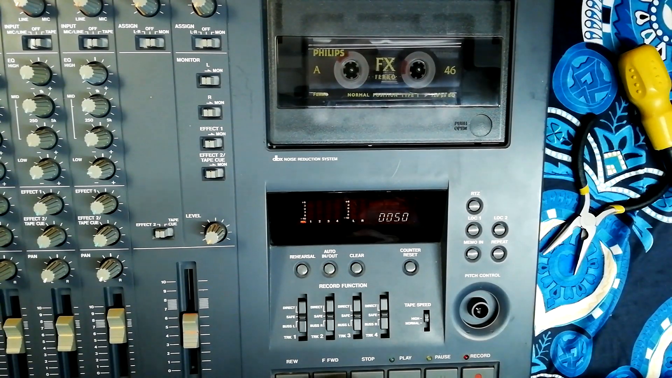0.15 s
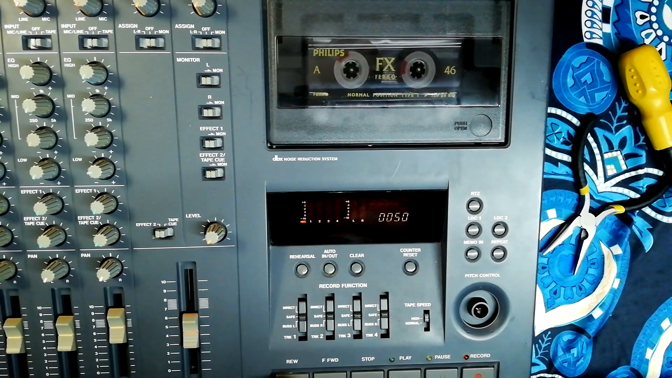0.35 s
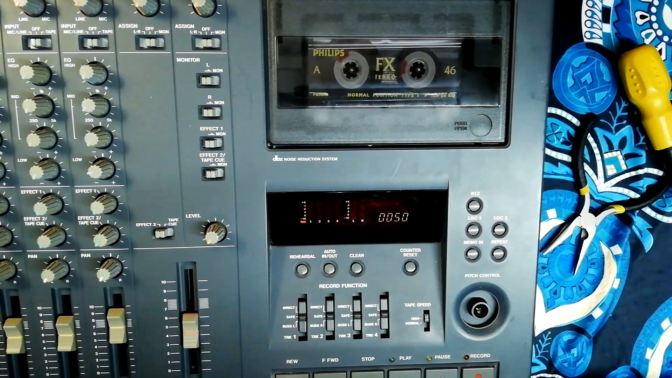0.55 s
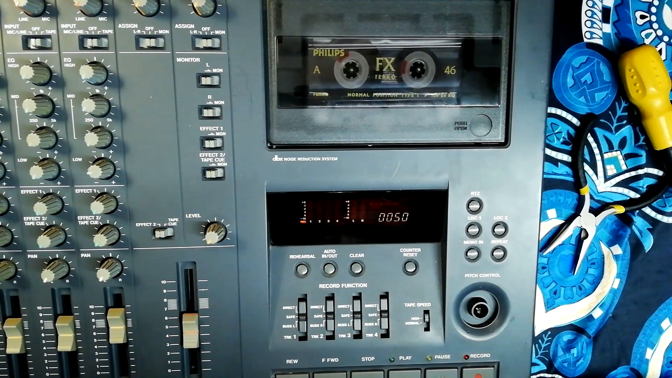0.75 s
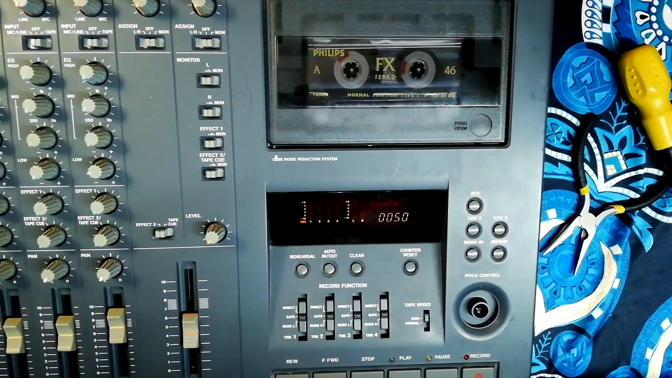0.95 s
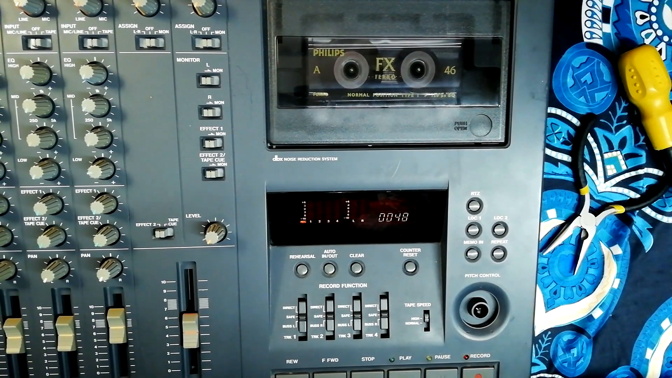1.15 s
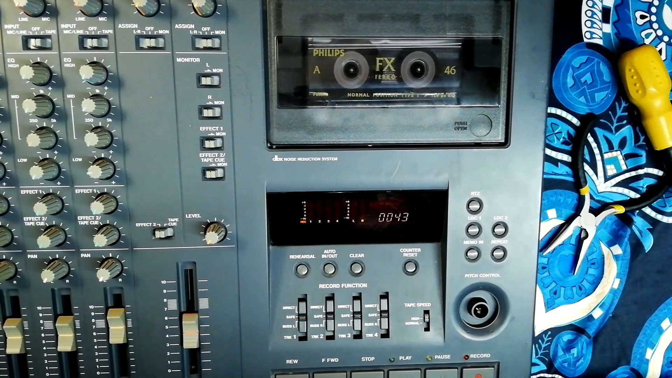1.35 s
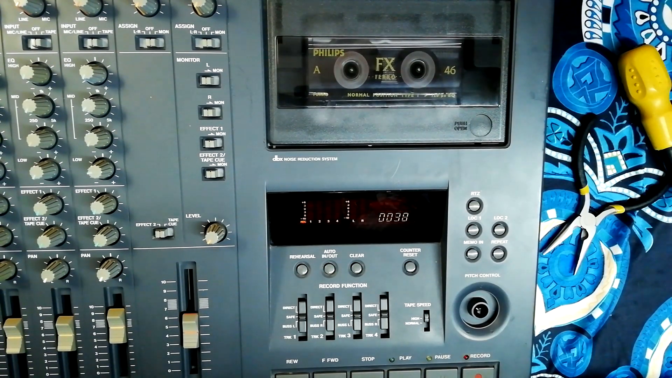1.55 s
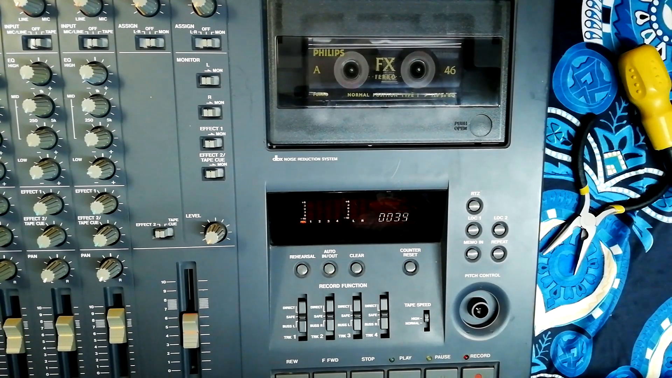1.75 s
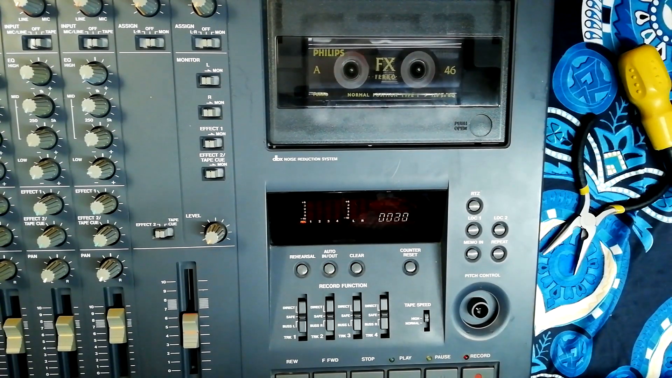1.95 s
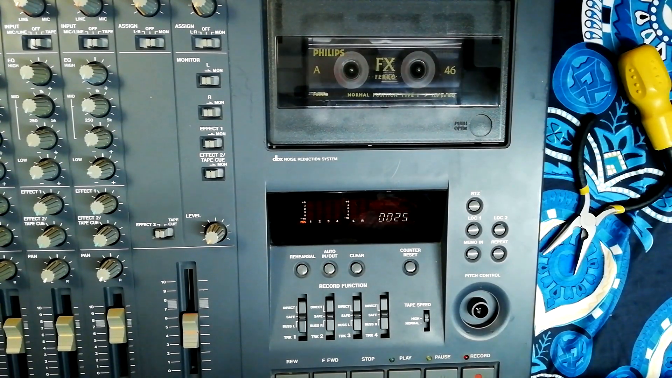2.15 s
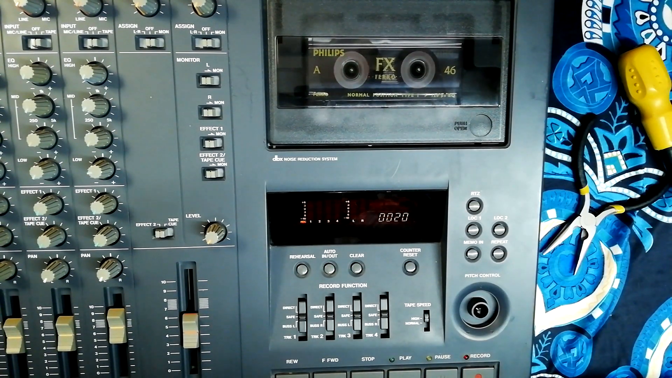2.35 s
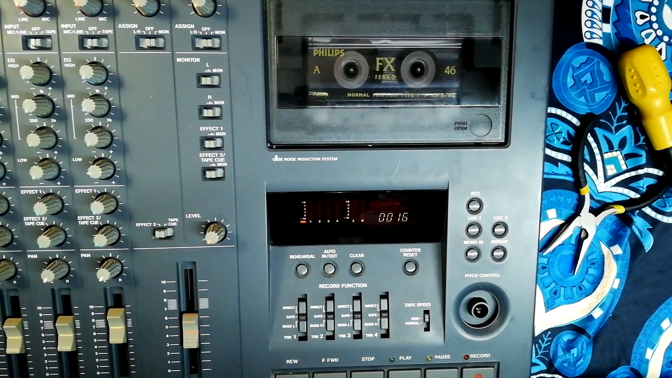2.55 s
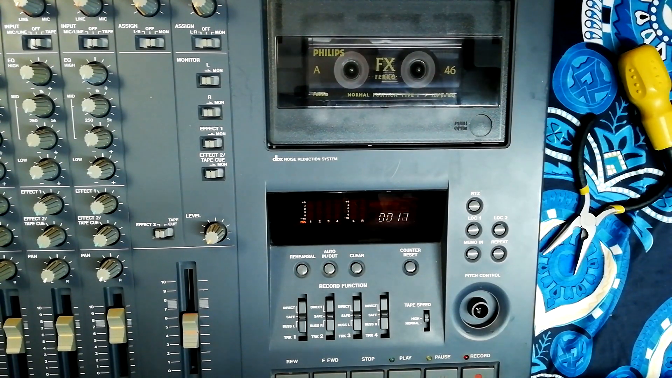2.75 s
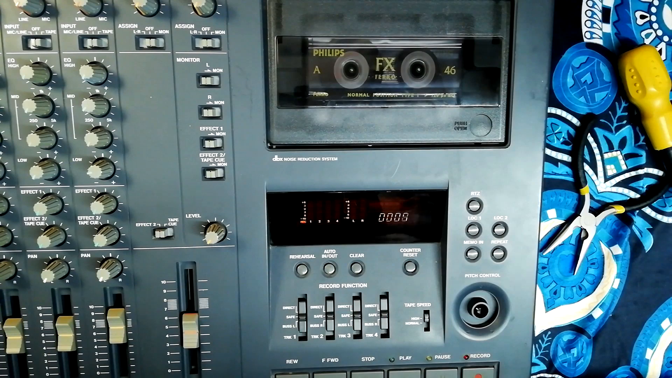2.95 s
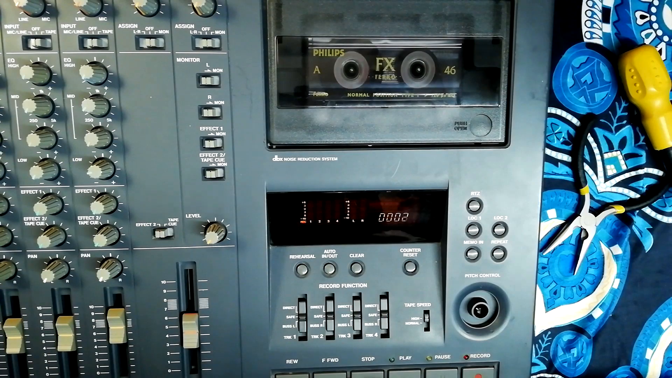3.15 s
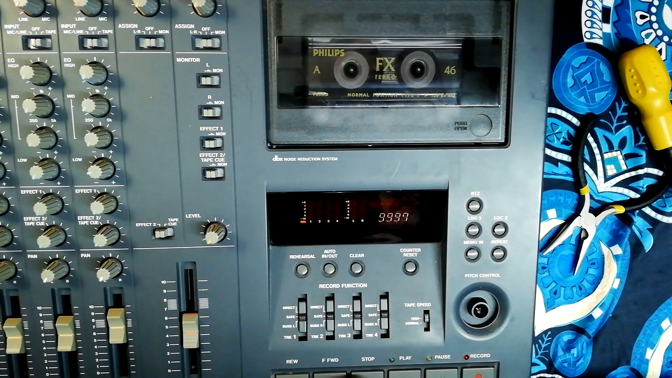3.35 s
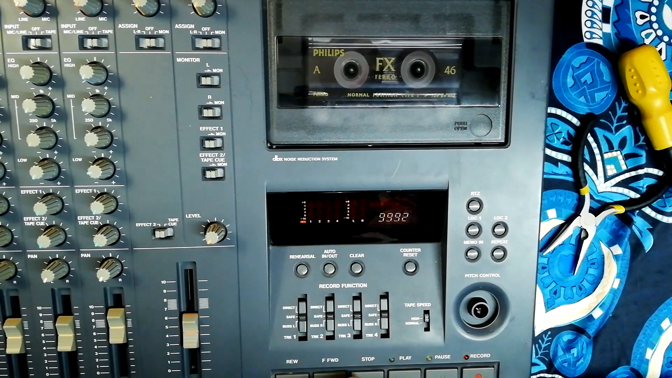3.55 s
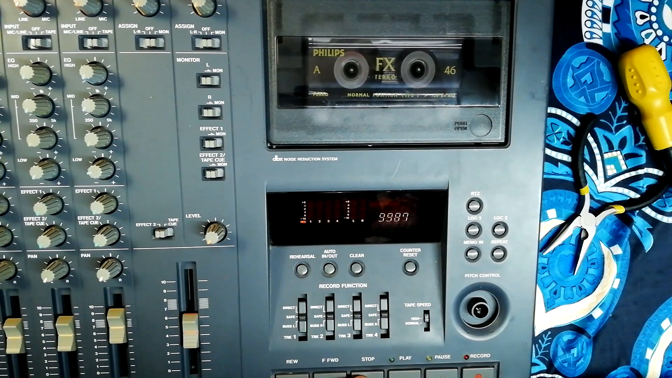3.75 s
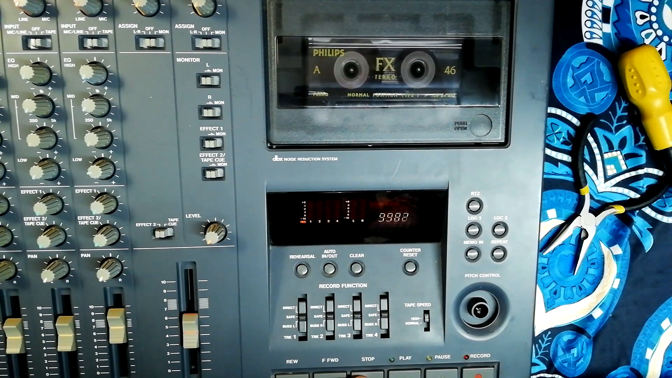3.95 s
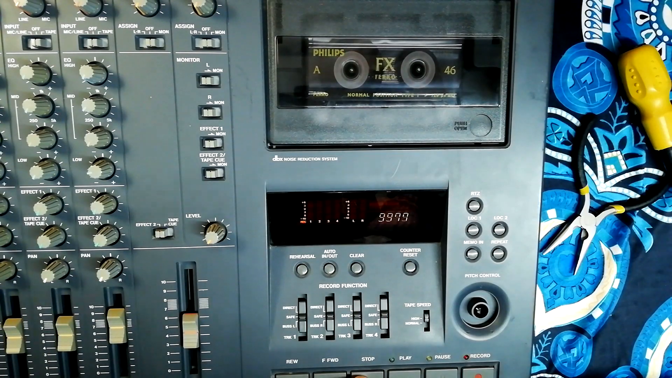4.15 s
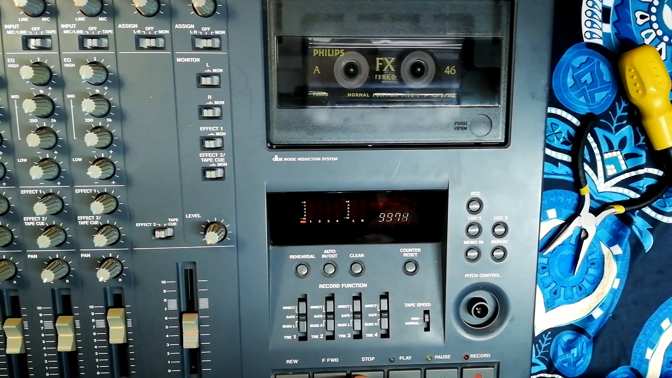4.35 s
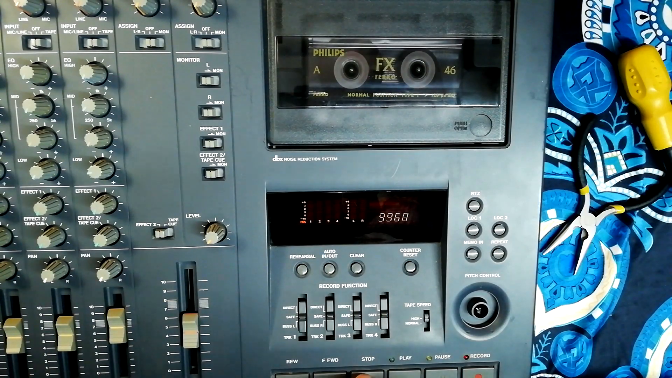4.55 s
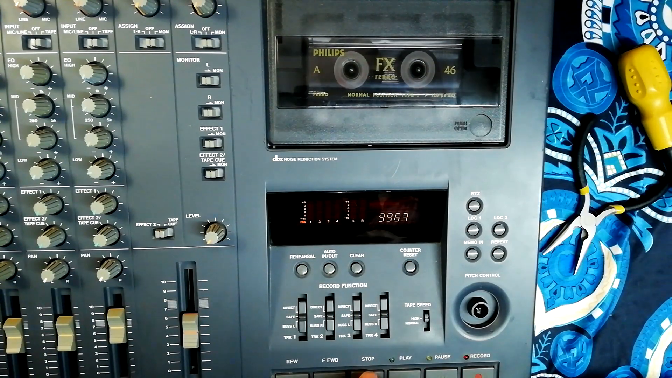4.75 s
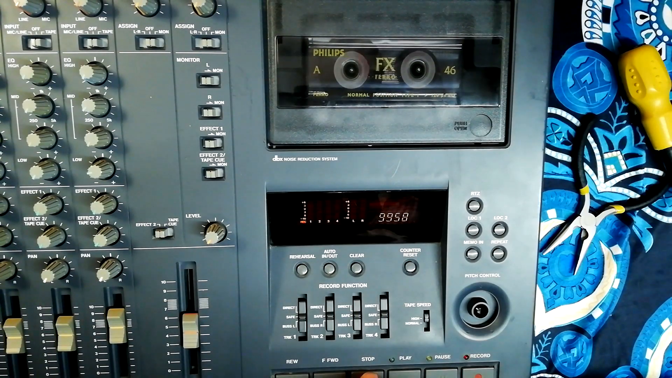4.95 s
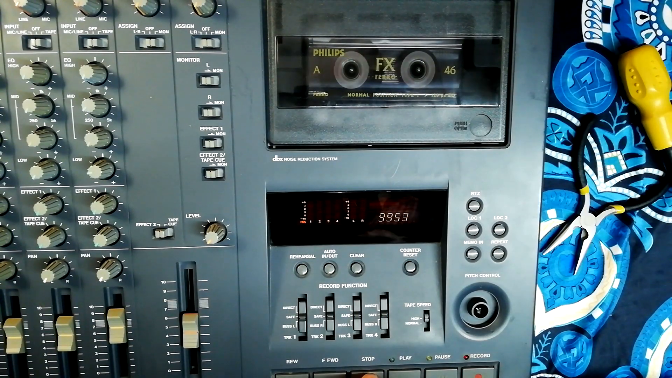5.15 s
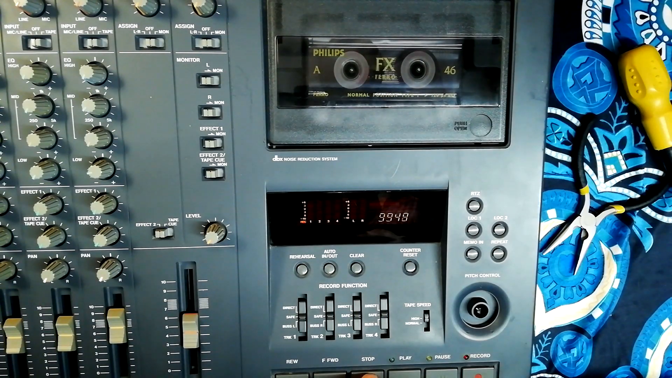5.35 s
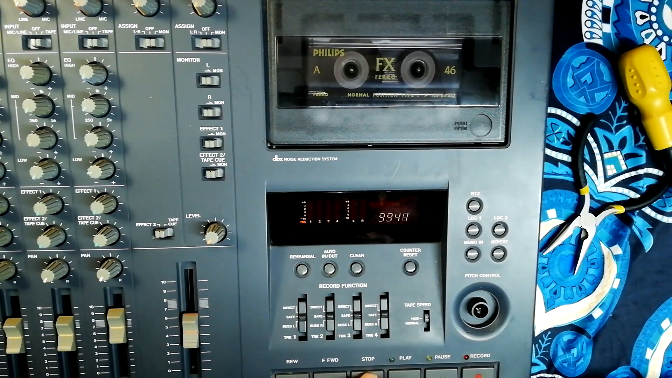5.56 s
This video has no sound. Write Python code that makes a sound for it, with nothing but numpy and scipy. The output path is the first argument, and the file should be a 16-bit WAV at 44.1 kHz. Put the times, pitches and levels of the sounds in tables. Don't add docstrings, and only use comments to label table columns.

```python
import sys
import numpy as np
from scipy import signal
from scipy.fft import rfft, irfft
from scipy.io import wavfile
from scipy.ndimage import uniform_filter1d

SR = 44100
rng = np.random.default_rng(int(sys.argv[2]) if len(sys.argv) > 2 else 0)


def elevation(decibels):
    levels = np.asarray(decibels, float)
    return 10 ** (levels / 20)


def file_out(sig):
    cols = np.atleast_2d(sig).T
    lim = np.clip(cols, -1, 1)
    pcm = np.round(lim * 32767).astype(np.int16)
    wavfile.write(sys.argv[1], SR, pcm)


N = 251347
T = np.arange(N) / SR
HZ = np.fft.rfftfreq(N, 1 / SR) + 1e-3

# pitch_hz, density_db
AIR_SPECTRUM = [(15, -12), (30, -1), (70, -3.5), (250, 0.5), (300, -4), (430, -3.5), (470, -7), (590, -24),
                (700, -6.5), (1250, -11.5), (2200, -13), (6000, -17.5), (11000, -17.5), (16500, -26.5)]
AIR_DB = -58.5
# pitch_hz, level_db
CAPSTAN_HUM = [(454.4, -67), (394, -84), (193, -80.5), (125.4, -73.5), (79, -75)]
ROOM_T60_S, ROOM_DB = 0.33, -16

# multiple, level_db
FORWARD_ORDERS = [(1, -58.5), (2, -52), (3, -56), (4, -65), (5, -80), (6, -60), (7, -69), (8, -75),
                  (9, -76)]
FORWARD_HZ, FORWARD_STOP_S, FORWARD_HISS_DB = 434.3, 0.12, -51.5

# start_s, level_db, pitch_hz
THUMPS = [(0.235, -45, 74.5), (0.294, -39, 154), (0.754, -46, 114), (0.811, -42, 138), (1.051, -37, 220),
          (1.298, -36, 149), (1.362, -35, 240), (1.430, -46.5, 213)]
THUMP_RISE_CYCLES, THUMP_FADE_CYCLES = 1.26, 1.7

# start_s, scrape_db, fade_t60_ms, chassis_ring_db and
# case_rumble_db re scrape
SLIDES = [(0.13, -35.5, 101.9, -7, -21), (0.166, -28.5, 64.81, -7, -14), (0.180, -34.5, 250, -26, -11),
          (0.209, -36.5, 40, -2, -1), (0.225, -33.5, 181, -10, -8), (0.287, -54, 64.8, 0, 15.5),
          (0.3, -45, 60, 1, 9), (0.314, -57, 200, 4, 10.5), (0.493, -37, 90, 0, -18),
          (0.507, -38, 60, 5.5, -10), (0.517, -41, 25, -4, 7), (0.524, -53.5, 151.2, -7, 7),
          (0.761, -33.5, 64.8, -14, -7.5), (0.785, -47, 277.8, -12, -7), (0.813, -53.5, 74.07, -4, 5),
          (0.959, -46, 64, 1, 0.5), (0.977, -49, 64.8, -3, -7), (0.997, -27.5, 64.8, 0.5, -10.5),
          (1.024, -39, 306, -4.5, -6.5), (1.263, -33, 162, -16, -35), (1.272, -25, 163, -9, -19),
          (1.283, -28.5, 129.6, -8.5, -14.5), (1.326, -30, 70, -4.5, -9), (1.351, -36.5, 40, 4, -12),
          (1.372, -46, 170, -2, -2.2),
    (1.396, -58.5, 600, -20, -3.2),
]
# pitch_hz, density_db
GRIT_SPECTRUM = [(880, -35), (1500, -30), (1800, -14), (2380, -7), (2580, -6), (3890, -9), (5530, -7.5),
                 (7700, -3), (9890, 0.5), (15700, -27), (16500, -30)]
# pitch_hz, density_db
RUBBED_CHASSIS = [(380, -40), (560, -3), (850, -2), (1020, -5.5), (1200, -10.5), (1345, 4.5), (1500, -8.5),
                  (1900, -8.5), (2600, -48)]
SLIDE_ATTACK_MS = 4
RING_LINGERS, RUMBLE_LINGERS = 0.98, 1.35

# start_s, tick_db, chassis_ring_db and case_thud_db re tick, rattle_decay_ms
LATCH_BLOWS = [(0.1531, -15, -20, -28, 0.94), (0.1556, -5, -15, -15.5, 4), (0.1987, -7.5, -7, -28, 5.8),
               (0.3005, -32.5, -2, -10, 1.1), (0.4921, -32, -23, -15, 1.4), (0.5142, -25.5, -16, -14, 2.4),
               (0.9857, -21, -9, -9, 11), (0.9892, -6, -14.5, -18, 7.3), (1.0055, -28, -1, -1, 8.1),
               (1.3626, -29, 0.5, 5, 3.3), (1.3660, -32.5, 6, -6, 1.6)]
# pitch_hz, density_db
LATCH_TICK = [(4500, -24), (6000, -10), (8000, -2.5), (10000, 2), (11500, -4), (14000, -11.5), (16500, -24),
              (18000, -45)]
# pitch_hz, density_db
LATCH_KNOCK = [(900, -45), (1700, 4), (2400, 2), (3000, -3.5), (3900, -0.5), (5000, -3), (6000, -28),
               (8000, -39)]
# pitch_hz, level_db, t60_s
CHASSIS_MODES = [(650, -8, 0.022), (886, -4, 0.027), (1033, -2, 0.019), (1352, -1.5, 0.054),
                 (1694, -7, 0.025)]
# pitch_hz, level_db, t60_s
CASE_MODES = [(109, -4, 0.059), (174, -8, 0.064), (215, -3.5, 0.16), (271.4, 6, 0.044), (365, 7, 0.031),
              (477, 6.5, 0.019)]
# start_s, tick_db, body_ring_db and case_thud_db re tick, rattle_decay_ms
KEY_CLICKS = [
    (0.1253, -16, -16.5, -15.5, 2.7),
    (0.4774, -44, -11, -12, 5.4),
    (0.7554, -17, -12.5, -44, 4.5),
    (0.8176, -40.5, -5, -9, 2.3),
    (0.9514, -30, 3, 6, 4.3),
]
# pitch_hz, density_db
KEY_TICK = [(3240, -41), (5500, -48), (6950, 6), (8280, -4.5), (9680, 6.5), (10500, -3), (14600, -16),
            (16500, -26)]
# pitch_hz, density_db
KEY_KNOCK = [(940, -39), (1600, -8.5), (2130, -2), (2450, -2), (2680, -6), (3980, -1.5), (4350, -15),
             (4760, 1), (6000, -26.5), (7800, -51), (13200, -120)]
# pitch_hz, level_db, t60_s
KEY_MODES = [(760, -12, .015), (962, 6.5, 0.017), (1290, 5.5, 0.021), (1470, 3, 0.0069)]
LATCH_KNOCK_DB, KEY_KNOCK_DB = -13.5, -8
SOFT_IS_DULL = 0.15

# pitch_hz, width_hz, level_db
WHIR_PEAKS = [(649, 59, 1.5), (964, 75, -3.5), (1366, 65, 7.5), (1539, 26, 5), (1734, 15, -0.5),
              (2025, 20, 3.5), (1400, 100, -2.5), (1860, 360, -15), (2410, 170, -7), (2556, 170, -1.5),
              (2713, 27, 8)]
# pitch_hz, level_db, t60_s
SHAFT_MODES = [(1372, -2.5, 0.029), (1500, -10, 0.048), (1696, -4, 0.058), (2013, 1, 0.13),
               (2676, -18, 0.027)]
# pitch_hz, density_db
HISS_SPECTRUM = [(500, -11.5), (1150, -14.5), (1500, -4.5), (3000, -5.5), (3500, -5.5), (6000, -10),
                 (6600, -4), (8200, -13), (10400, -6), (11000, -14), (15700, -18.5), (17000, -24)]
# pitch_hz, width_hz, level_db
SHELL_PEAKS = [(4206, 110, 0), (4530, 190, -1.5), (5080, 340, -4), (5550, 210, -1.5), (6300, 400, -5.5),
               (7140, 52, -3.5), (6940, 100, 3), (7700, 640, 0), (8800, 360, -0.5), (9540, 710, -1.5),
               (10340, 290, -6)]
# start_s, level_db, pitch_hz
SNAGS = [(1.8846, -47, 8430), (1.912, -40, 5960), (2.8595, -44, 6740), (3.1856, -42, 6580),
         (4.275, -44, 6760), (4.777, -41, 6600)]
# multiple, level_db
REWIND_ORDERS = [(1, -72.5), (2, -66.5)]
# time_s, tension_db re start
TENSION = [(1.6, 0), (2.2, 0.5), (2.74, 2.5), (2.9, 1.5), (3.28, 3.5), (3.7, 1.5), (4.05, 2.5), (4.6, 2.5),
           (4.92, 3.5), (5.2, 3.5), (5.4, 4), (5.55, 3), (5.7, 4)]
REWIND_HZ, SHAFT_DB = 423.7, -5
WHIR_DB, HISS_DB, RUB_DB, SQUEAL_DB = -57, -56, -72.5, -66
RUB_PER_DB, SQUEAL_PER_DB = 3.5, 2.76
ENGAGE_S, SURGE_DB, SURGE_S = 1.405, 5.5, 0.13

# pitch_hz, likeness_0_to_1
PORTS_ALIKE = [(60, 0.96), (170, 0.85), (340, 0.52), (600, 0), (1000, 0.31), (1400, 0.87), (1750, 0.61),
               (2400, 0), (5800, 0.28), (6500, 1), (7200, 0.08)]
# pitch_hz, left_minus_right_db
KNOCK_BALANCE = [(60, 0), (110, 2), (200, -1), (380, 1), (700, -1.5), (1290, 2), (2380, -2.5), (4400, -1.5),
                 (8120, 3.5), (15000, -1)]
# pitch_hz, left_minus_right_db
STEADY_BALANCE = [(60, 0), (110, 0.5), (200, -0.5), (380, 2), (700, -2.5), (1290, 1.5), (2380, 2),
                  (4400, -0.5), (8120, 4), (15000, -0.5)]
KNOCKS_CLOSER = 0.1
LEFT_LATE_S = 40.909e-6
TOP_BAND_HZ, LIMIT_HZ = 15760, 16650


def unit(x):
    return x / np.sqrt(np.mean(x ** 2))


def on_hz(table):
    hz, value = np.transpose(table)
    return np.interp(np.log(HZ), np.log(hz), value)


def noise(length=N):
    return rng.standard_normal((2, length))


def walk(rate):
    k = int(SR / rate)
    steps = np.repeat(rng.standard_normal(N // k + 1), k)
    return unit(uniform_filter1d(steps, k)[:N])


def through(x, taps):
    taps = taps / np.linalg.norm(taps)
    return signal.fftconvolve(x, taps[None], axes=-1)[:, :x.shape[1]]


def colour(x, table):
    hz, db = np.transpose(table)
    grid = np.fft.rfftfreq(1024, 1 / SR) + 1
    cepstrum = irfft(np.interp(np.log(grid), np.log(hz), db) * np.log(10) / 20)
    cepstrum[1:512] *= 2
    cepstrum[513:] = 0
    return through(x, irfft(np.exp(rfft(cepstrum))))


def ring(x, modes):
    t = T[:SR // 3]
    taps = np.zeros(len(t))
    for k, (hz, db, t60) in enumerate(modes):
        decay = np.exp(-np.log(1000) * t / t60)
        taps += (-1) ** k * elevation(db) * decay * np.sin(2 * np.pi * hz * t)
    return through(x, taps)


def resonate(x, peaks, flicker_db):
    out = 0
    for hz, width, db in peaks:
        peak = signal.iirpeak(hz, hz / (1.36 * width), SR)
        once = signal.lfilter(*peak, noise() * x)
        out = out + elevation(db + flicker_db * walk(9)) * signal.lfilter(*peak, once)
    return unit(out)


def tones(hz, orders, wobble, waver_db=1.5):
    phase = 2 * np.pi * np.cumsum(hz * (1 + wobble * walk(30))) / SR
    out = 0
    for k, db in orders:
        level = np.sqrt(2) * elevation(db + waver_db * walk(15))
        out = out + level * np.sin(k * phase + rng.uniform(0, 2 * np.pi, (2, 1)))
    return out


def air():
    hum = sum(tones(np.full(N, hz), [(0.98, db)], 0.002) for hz, db in CAPSTAN_HUM)
    hush = irfft(rfft(noise()) * elevation(on_hz(AIR_SPECTRUM)), N)
    return elevation(AIR_DB) * unit(hush) + hum


def room_echo(x):
    t = T[:SR // 2]
    walls = noise(len(t)) * np.exp(-np.log(1000) * t / ROOM_T60_S) * np.clip(t / 0.002, 0, 1)
    walls = colour(walls, [(100, -9.5), (3000, 0.5), (10000, -13.5), (16000, -8.5)])
    return elevation(ROOM_DB) * signal.fftconvolve(x, walls / np.linalg.norm(walls[0]), axes=-1)[:, :N]


def forward():
    hiss = colour(noise(), [(600, -3.5), (1500, 2.5), (3000, -6), (6000, -7.5), (7800, 0), (10000, 0.5),
                            (11500, -14), (16000, -18)])
    sound = tones(np.full(N, FORWARD_HZ), FORWARD_ORDERS, 0.0037, 1.7) + elevation(FORWARD_HISS_DB) * hiss
    return sound * np.clip((FORWARD_STOP_S + .03 - T) / 0.028, 0, 1)


def thumps():
    out, t = np.zeros((2, N)), T[:SR // 4]
    for s, db, hz in THUMPS:
        cycles, i = t * hz, int(s * SR)
        rise = np.minimum(cycles / THUMP_RISE_CYCLES, 1)
        fade = np.exp(-np.maximum(cycles - THUMP_RISE_CYCLES, 0) / THUMP_FADE_CYCLES)
        out[0, i:i + len(t)] += elevation(db) * rise * fade * np.sin(2 * np.pi * cycles)
    return out


def slides():
    power = np.zeros((3, N))
    ms = T[:SR] * 1000
    rise = np.minimum(ms / SLIDE_ATTACK_MS, 1)
    for s, db, t60_ms, ring_db, rumble_db in SLIDES:
        i = int(s * SR)
        late = np.maximum(ms - SLIDE_ATTACK_MS, 0) / max(t60_ms, 5)
        bodies = [(db, 1), (db + ring_db, RING_LINGERS), (db + rumble_db, RUMBLE_LINGERS)]
        for k, (level, linger) in enumerate(bodies):
            power[k, i:i + SR] += (rise * elevation(level) / 1000 ** (late / linger)) ** 2
    scrape, chassis, case = np.sqrt(power)
    grit = noise() * elevation(2.2 * walk(500) - .6)
    return colour(scrape * grit, GRIT_SPECTRUM) + colour(chassis * grit, RUBBED_CHASSIS) + ring(case * grit, CASE_MODES)


def blows(table, tick, knock, body, full_knock_db):
    out, t = np.zeros((2, N)), T[:SR // 2]
    for s, db, ring_db, thud_db, decay_ms in table:
        knock_db = full_knock_db - SOFT_IS_DULL * db
        push = noise(len(t)) * np.minimum(t / 0.00014, 1) * np.exp(-t * 1000 / max(decay_ms, .6))
        strike = 0.14 * push
        strike[[0, 1], rng.integers(10, 60, 2)] += 1
        thud = noise(len(t)) * np.minimum(t / 0.003, 1) * np.exp(-t / 0.0051)
        parts = [colour(push, tick), colour(push, knock), ring(strike, body), ring(thud, CASE_MODES)]
        levels = db + np.array([3, 9 + knock_db, 6.5 + ring_db, -7 + thud_db])
        i = int(s * SR)
        for part, level in zip(parts, levels):
            out[:, i:i + len(t)] += elevation(level) * part / np.abs(part).max()
    return out


def shaft(turns):
    at = np.flatnonzero(np.diff(turns.astype(int)))
    taps = np.zeros((2, N))
    for row in taps:
        chance = rng.standard_normal((len(at), 2))
        when = np.clip(at + (12 * chance[:, 0]).astype(int), 0, N - 1)
        np.add.at(row, when, elevation(2.5 * chance[:, 1]))
    return unit(ring(taps, SHAFT_MODES))


def snags():
    out, t = np.zeros((2, N)), T[:600]
    for s, db, hz in SNAGS:
        i = int(s * SR)
        burst = noise(len(t)) * np.exp(-t / 0.0049)
        tick = colour(burst, [(4500, -25), (hz, 0), (10500, -8), (13000, -25), (16000, -35)])
        out[:, i:i + len(t)] += elevation(db + 0.5) * tick
    return out


def rewind():
    tension = np.interp(T, *np.transpose(TENSION))
    surge = SURGE_DB * np.exp(-(np.maximum(T - ENGAGE_S, 0) / SURGE_S) ** 2)
    hz = REWIND_HZ * (1 + .003 * walk(1.5))
    turns = np.cumsum(hz / 10) / SR
    uneven = elevation(1.6 * rng.standard_normal(300))[turns.astype(int)]
    puff = np.exp(-(turns % 1) / .22) * uneven
    drag = elevation(0.96 * walk(120)) * (0.76 + 0.49 * puff)
    whir = elevation(-2.0) * resonate(.35 + 1.5 * puff, WHIR_PEAKS, .3) + elevation(SHAFT_DB) * shaft(turns)
    hiss = elevation(0.5) * colour(noise() * drag, HISS_SPECTRUM) + elevation(-0.5) * resonate(drag, SHELL_PEAKS, 0.22)
    rub = resonate(2.5 + puff, [(3440, 200, 0)], .6)
    squeal = resonate(drag, [(6510, 89, 0)], 0.74)
    sound = elevation(WHIR_DB + surge) * whir
    sound += elevation(HISS_DB + tension + surge) * hiss
    sound += elevation(RUB_DB + RUB_PER_DB * tension + surge) * rub
    sound += elevation(SQUEAL_DB + SQUEAL_PER_DB * tension + surge) * squeal
    sound += snags() + tones(hz, REWIND_ORDERS, 0.0035)
    return sound * np.clip((T - 1.36) / 0.017, 0, 1)


def ports(pair, balance, closer=0.):
    a, b = rfft(pair)
    alike = np.clip(on_hz(PORTS_ALIKE) + closer * (HZ < 2000), 0, .98)
    mid, side = a * np.sqrt((1 + alike) / 2), b * np.sqrt((1 - alike) / 2)
    lean = elevation(on_hz(balance) / 2)
    left = (mid + side) * lean * np.exp(-2j * np.pi * HZ * LEFT_LATE_S)
    return irfft(np.array([left, (mid - side) / lean]), N)


def scene():
    steady = ports(air() + forward() + rewind(), STEADY_BALANCE)
    action = thumps() + slides()
    action += blows(LATCH_BLOWS, LATCH_TICK, LATCH_KNOCK, CHASSIS_MODES, LATCH_KNOCK_DB)
    action += blows(KEY_CLICKS, KEY_TICK, KEY_KNOCK, KEY_MODES, KEY_KNOCK_DB)
    no_bass = signal.butter(2, 70, "high", fs=SR, output="sos")
    knocks = signal.sosfilt(no_bass, action + room_echo(action))
    return steady + ports(knocks, KNOCK_BALANCE, KNOCKS_CLOSER)


def top_cut(x):
    return signal.sosfilt(signal.butter(12, 16980, fs=SR, output="sos"), x)


def record(dry):
    spectrum = rfft(dry)
    top = irfft(spectrum * (HZ > TOP_BAND_HZ), N)
    loud = uniform_filter1d(np.abs(top).max(axis=0), size=1024) > elevation(-50)
    quiet = 1 - uniform_filter1d(1. * loud, size=256)
    rounded = np.tanh(dry / .9) * .9
    rounded = irfft(rfft(rounded) * (HZ < LIMIT_HZ), N)
    top = top - irfft(spectrum * (HZ >= LIMIT_HZ), N)
    return top_cut(rounded - top * quiet)


dry = scene()
out = record(dry)
file_out(out)
```